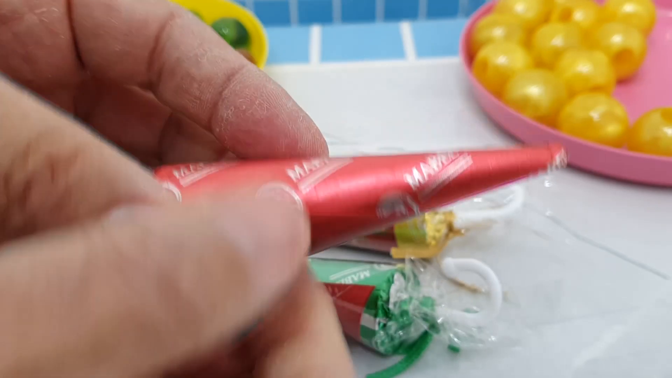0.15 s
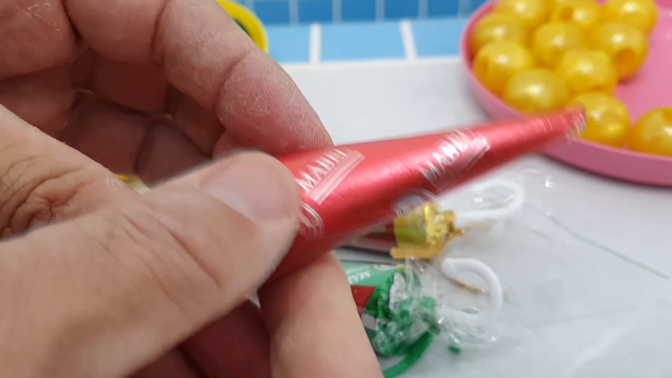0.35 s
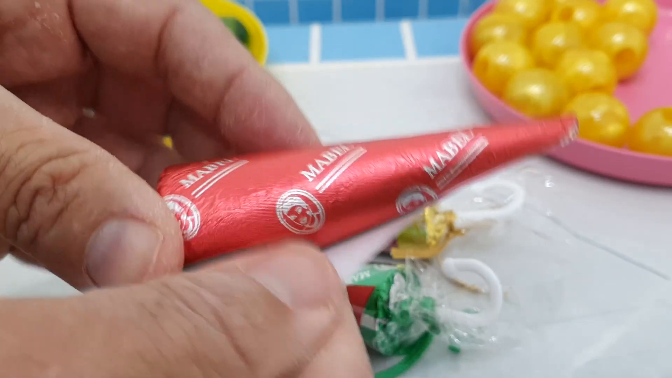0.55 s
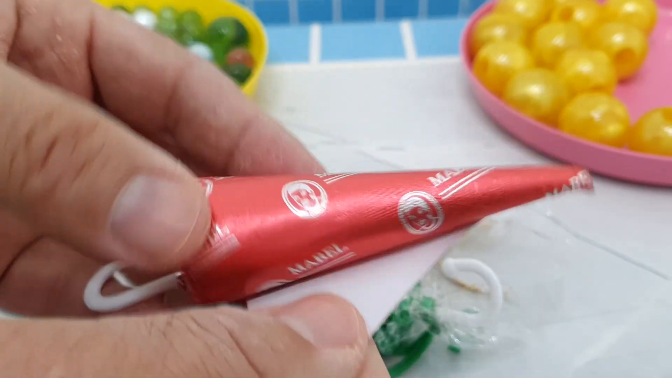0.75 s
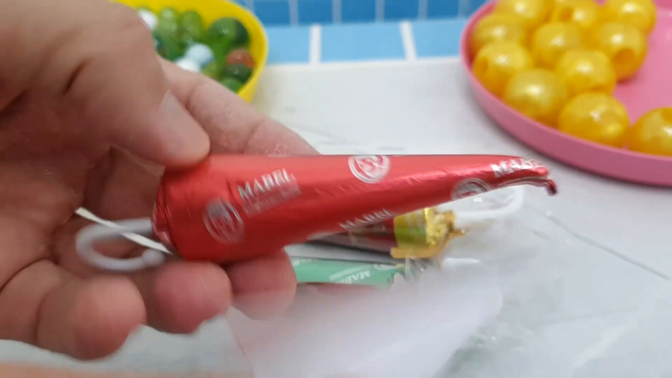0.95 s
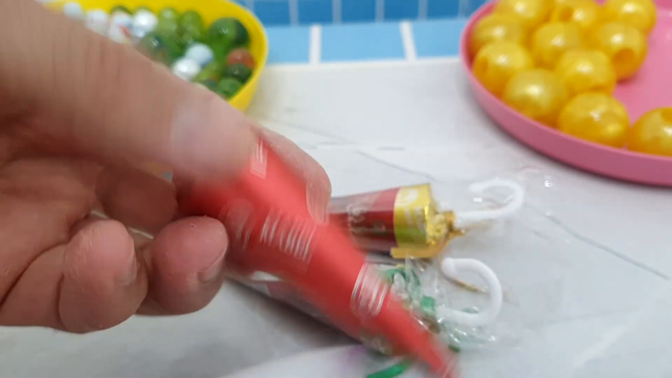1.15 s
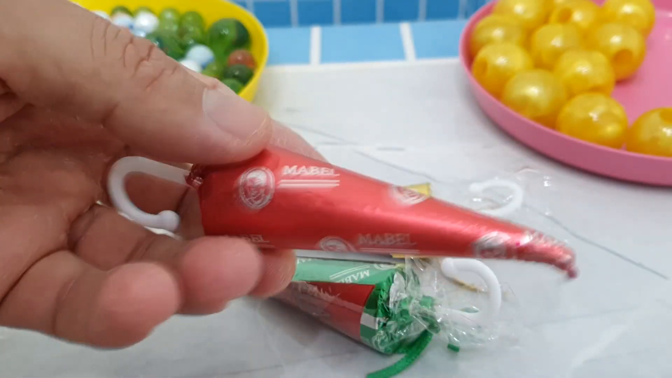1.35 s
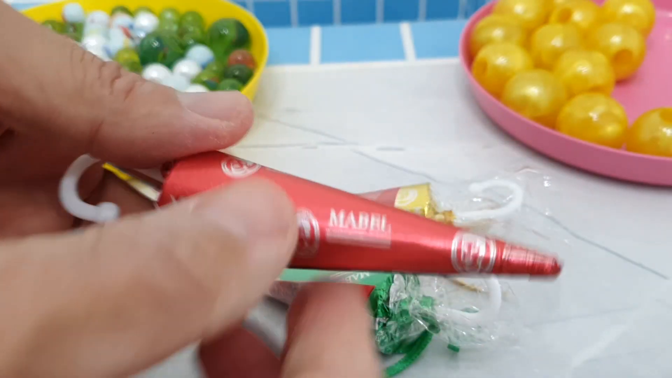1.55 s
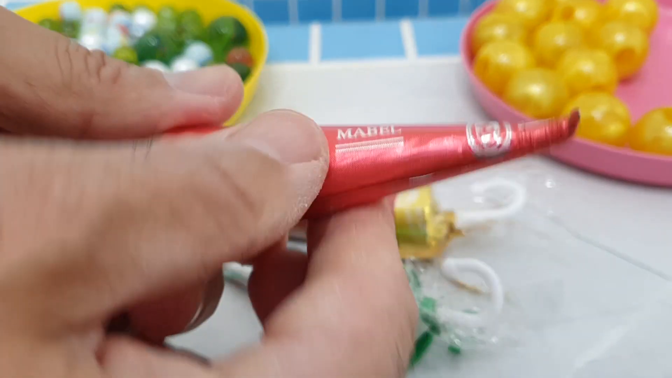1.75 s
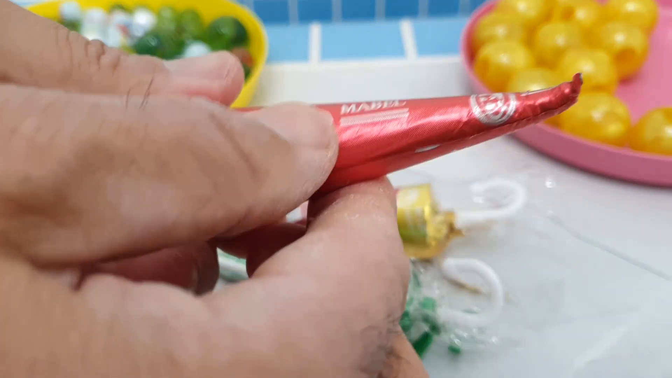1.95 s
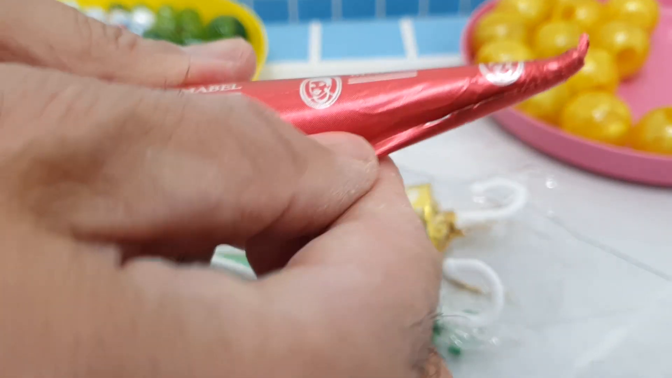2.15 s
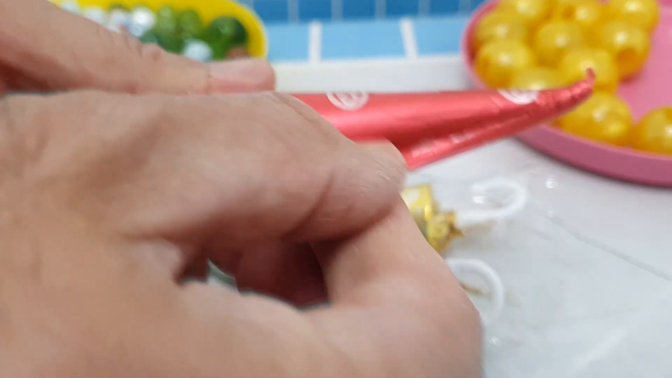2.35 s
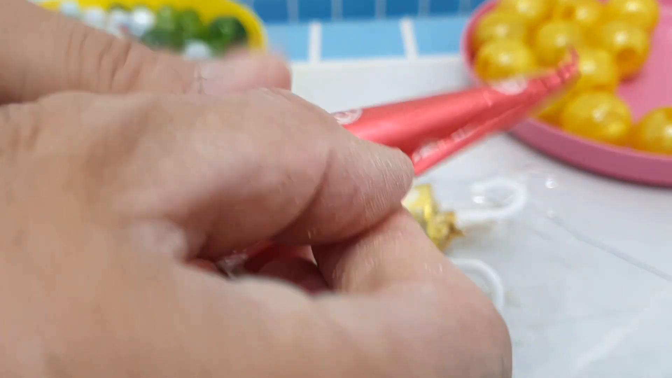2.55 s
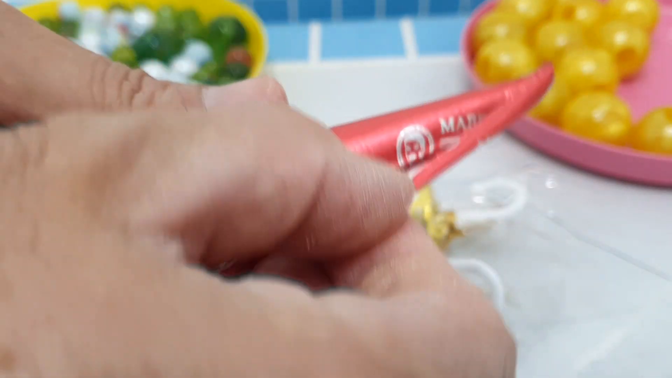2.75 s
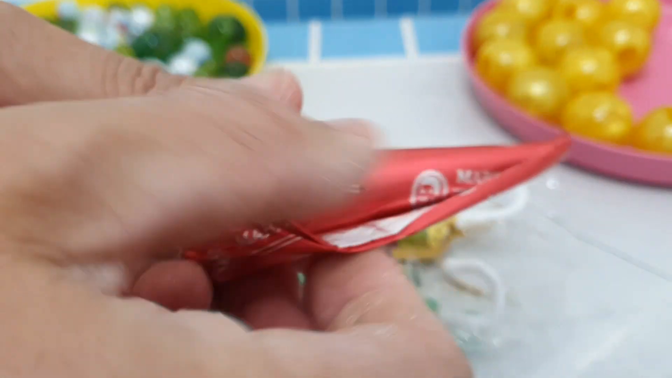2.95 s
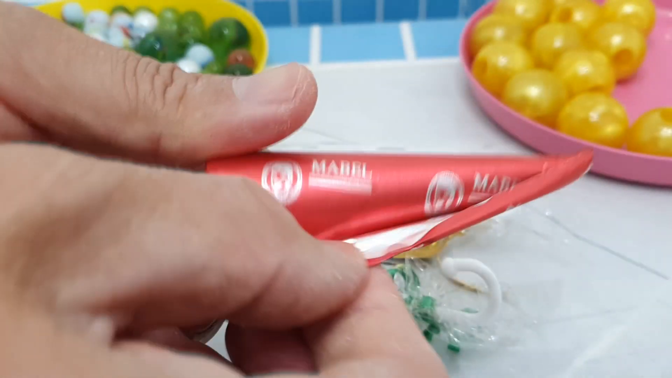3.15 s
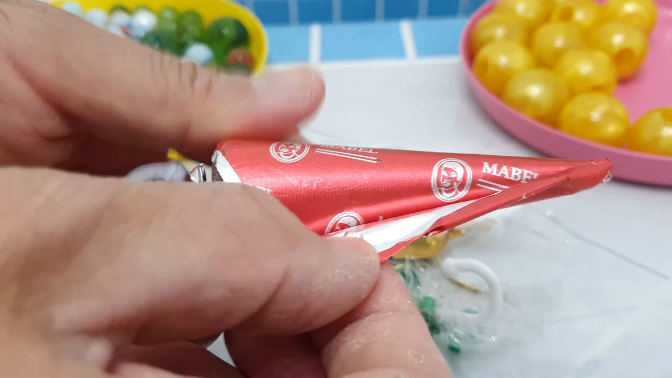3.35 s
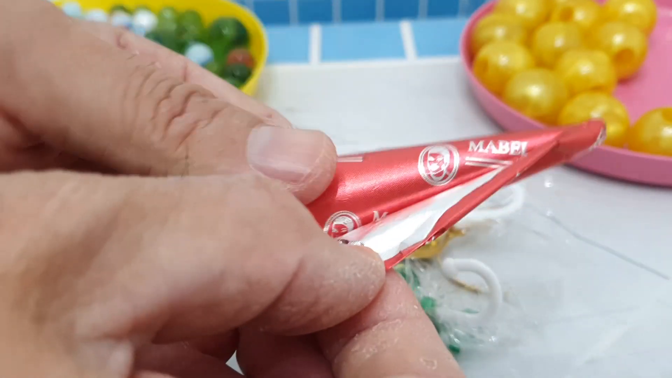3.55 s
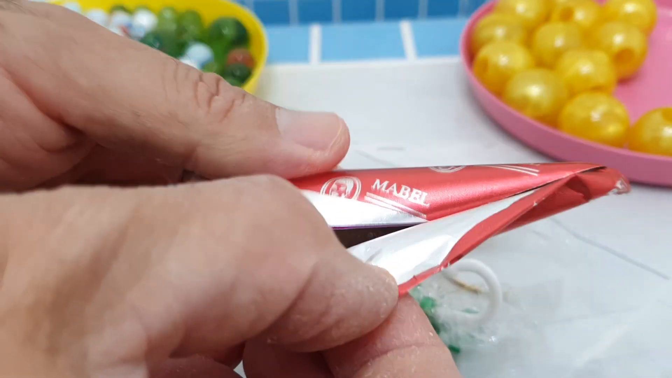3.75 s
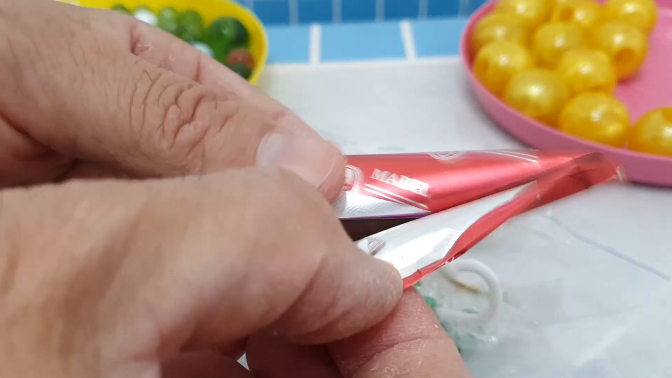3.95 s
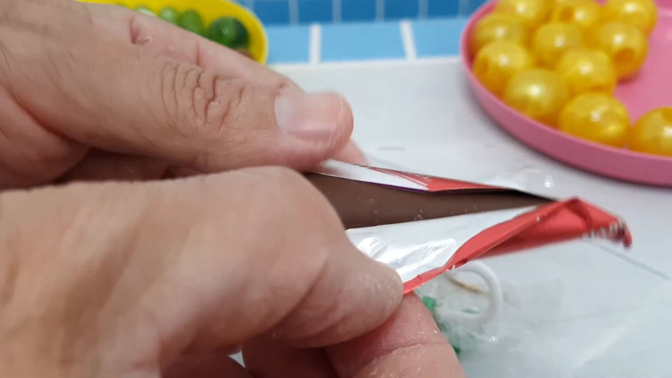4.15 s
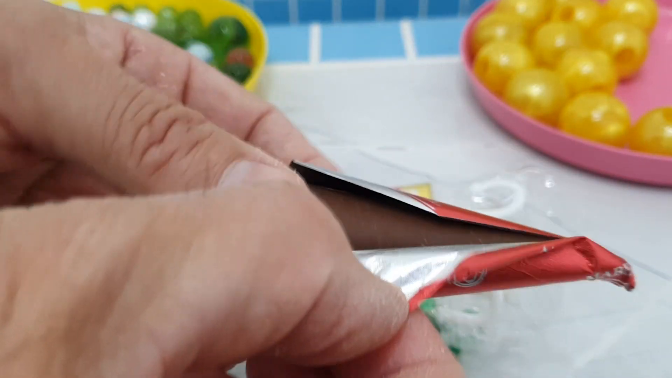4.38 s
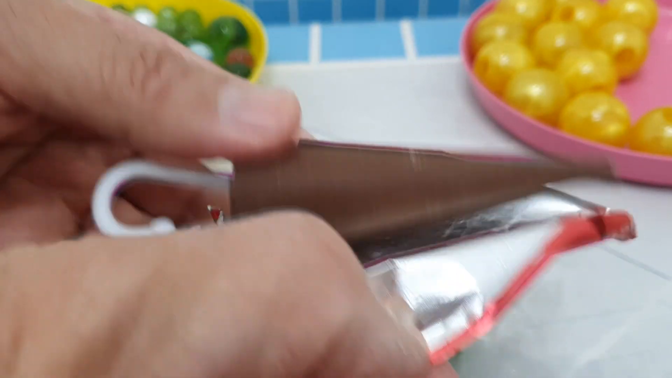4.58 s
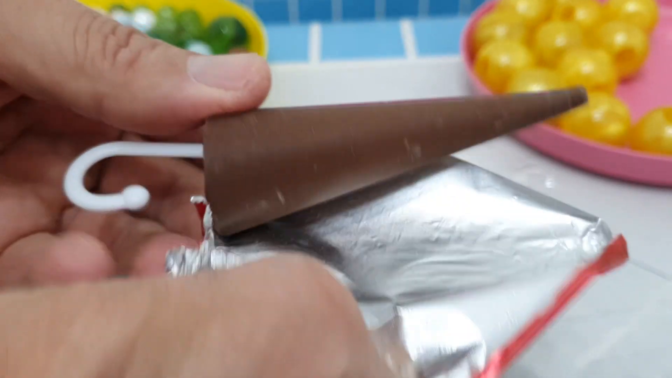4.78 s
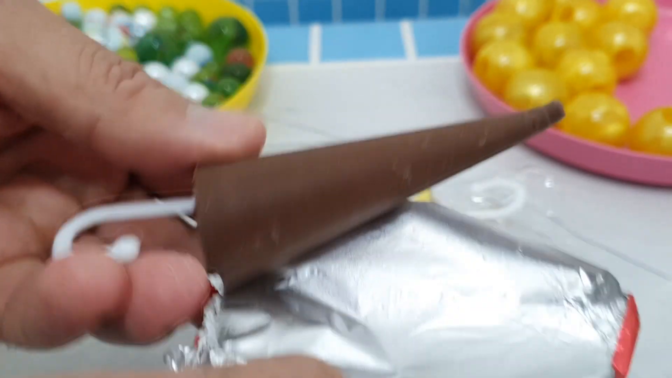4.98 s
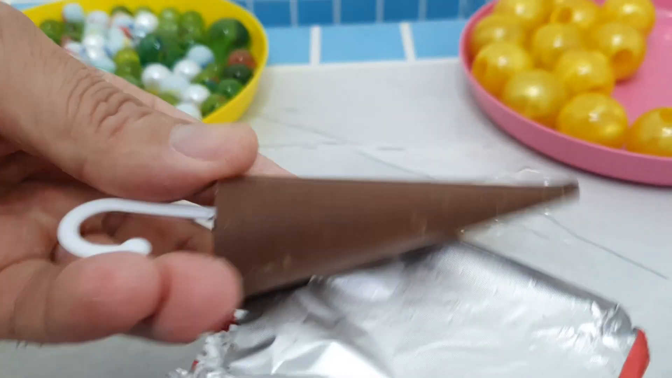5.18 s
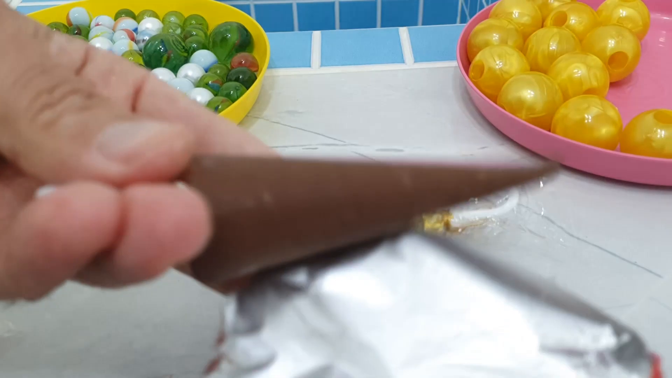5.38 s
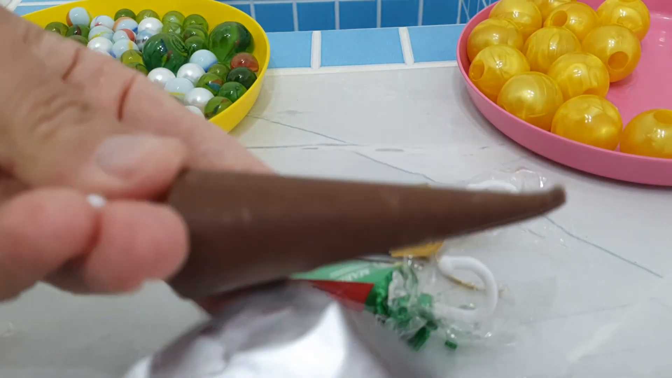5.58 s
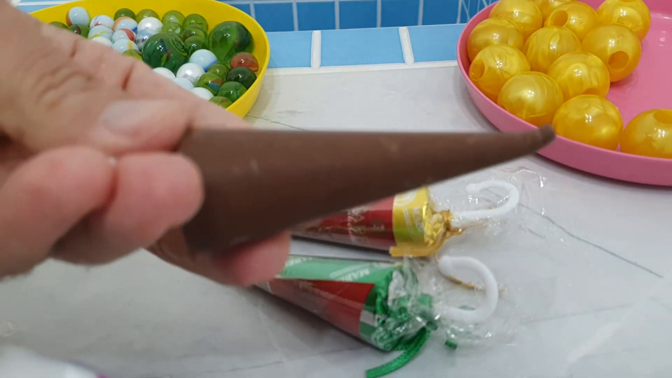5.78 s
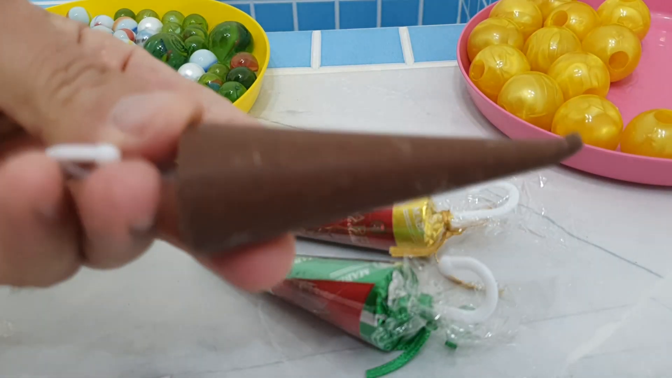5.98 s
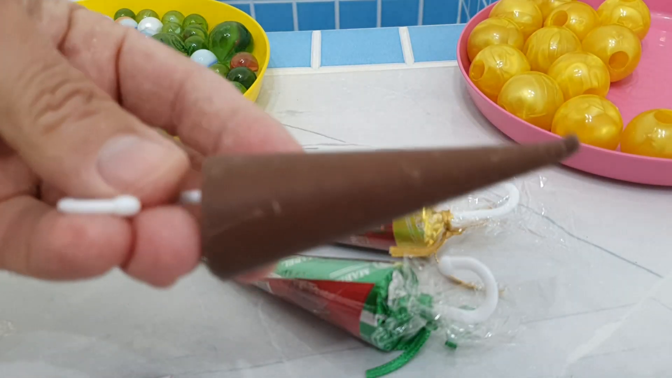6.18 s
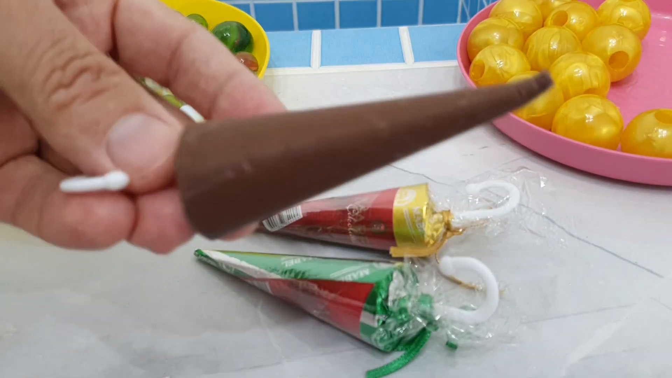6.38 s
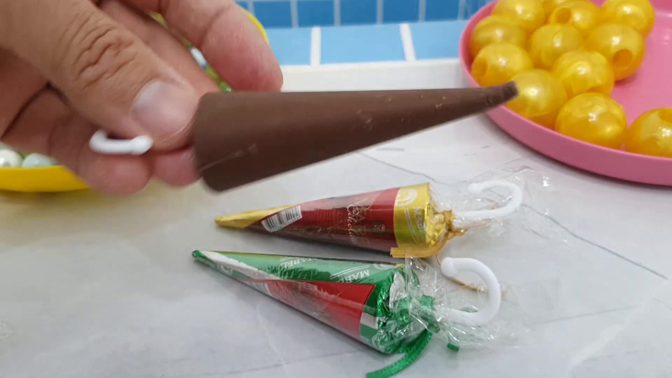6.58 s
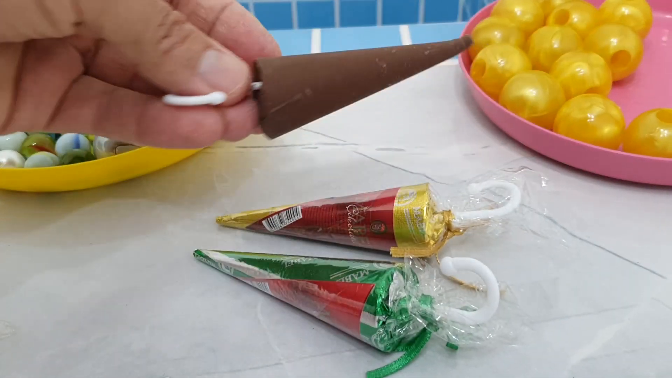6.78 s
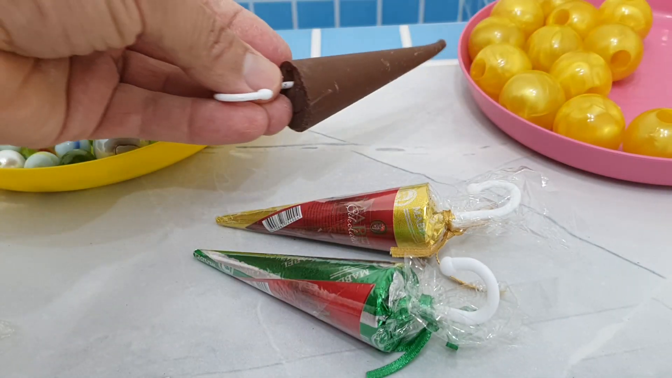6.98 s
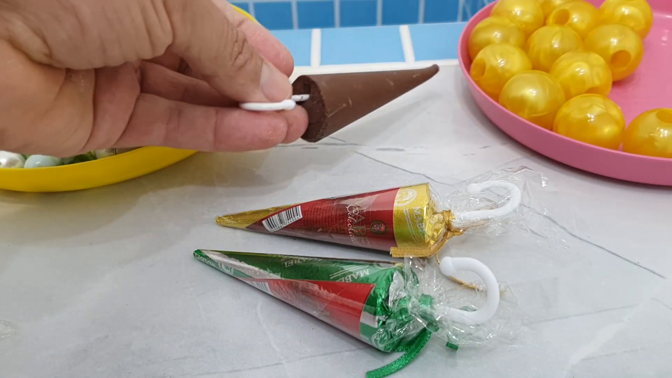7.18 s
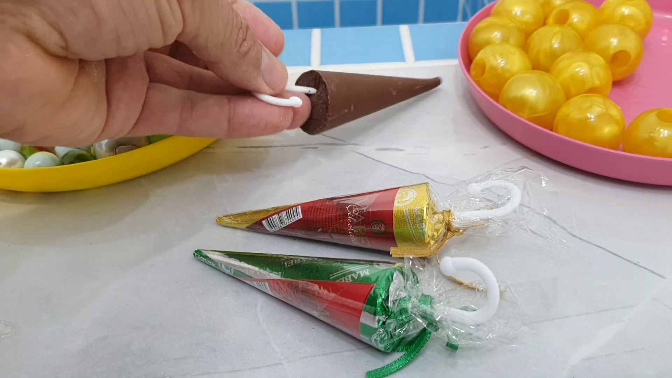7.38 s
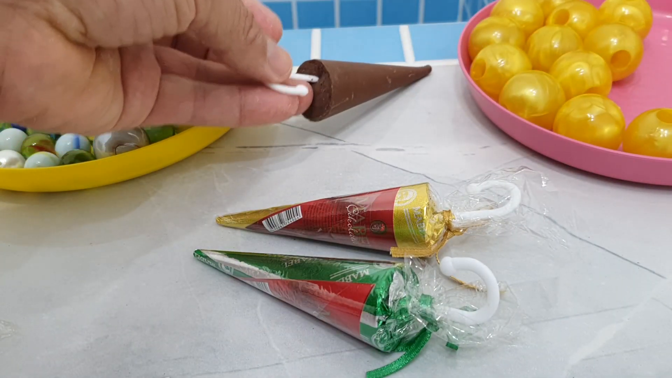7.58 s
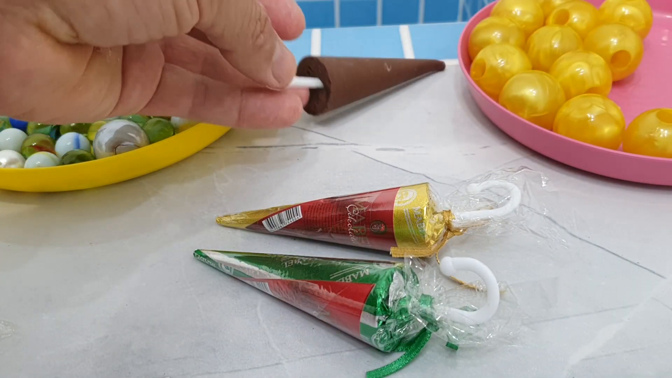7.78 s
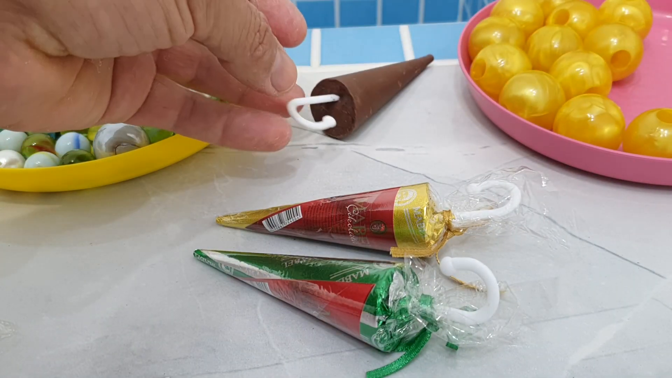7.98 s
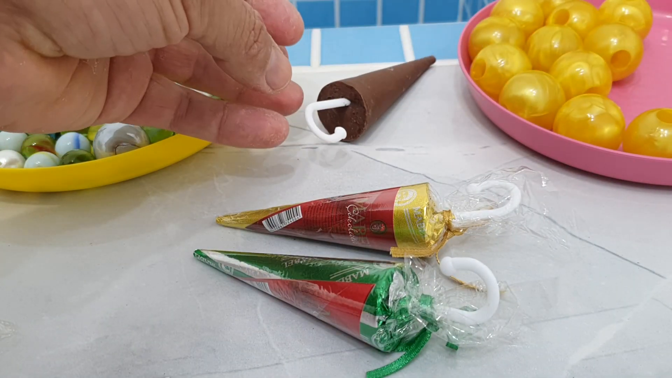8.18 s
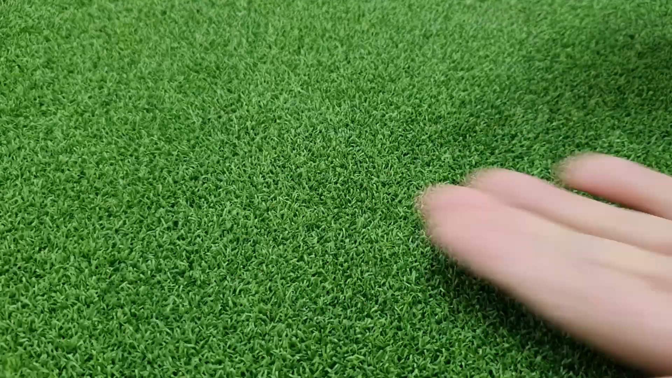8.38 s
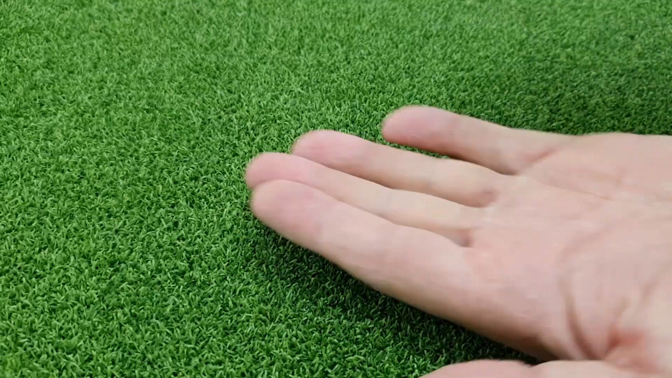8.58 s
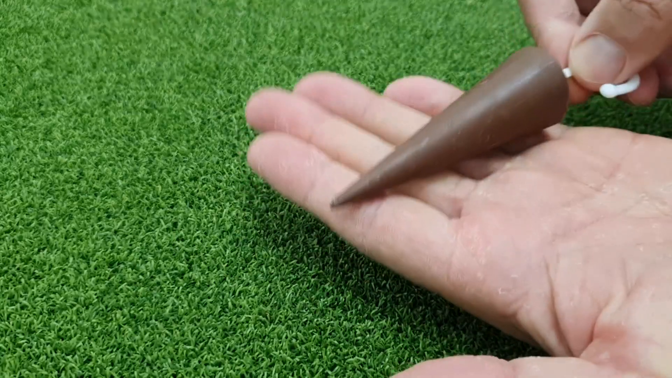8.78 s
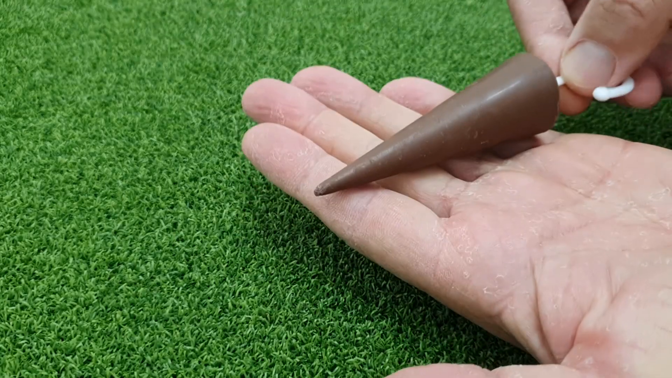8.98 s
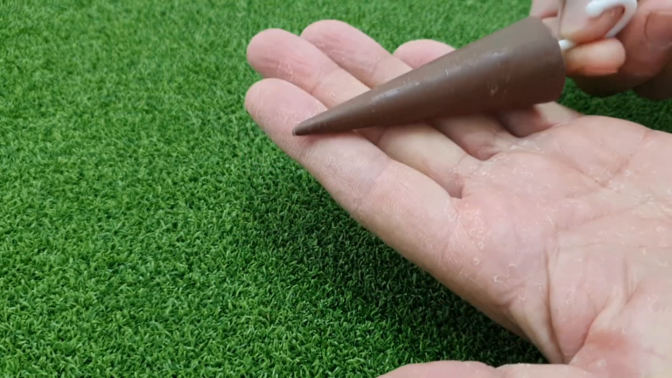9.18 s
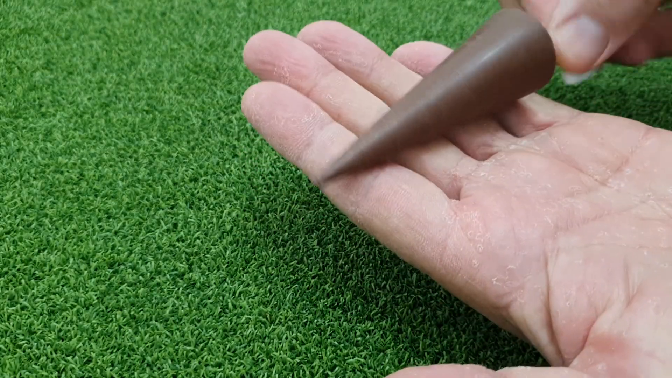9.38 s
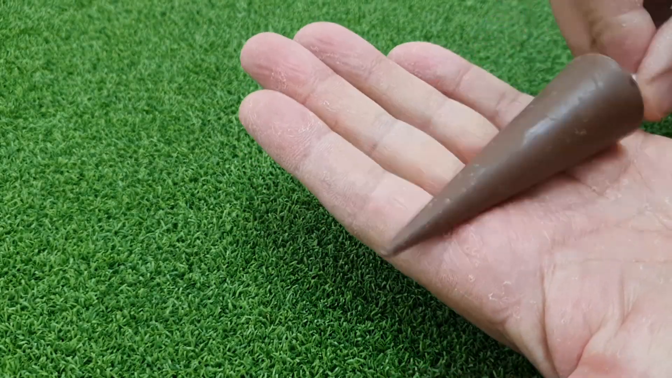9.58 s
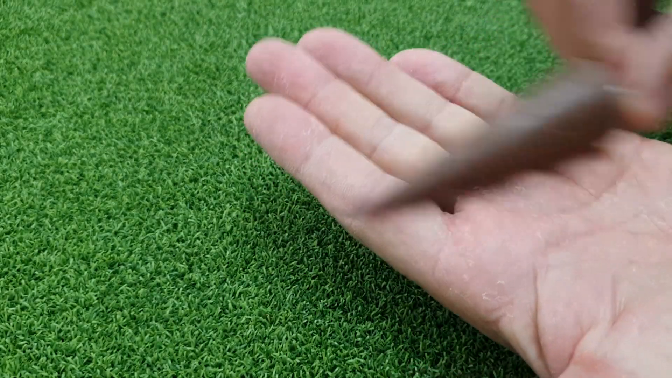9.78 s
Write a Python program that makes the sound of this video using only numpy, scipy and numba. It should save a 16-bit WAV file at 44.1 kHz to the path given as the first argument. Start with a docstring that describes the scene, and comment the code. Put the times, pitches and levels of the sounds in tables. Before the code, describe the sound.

Hands unwrap a foil-covered chocolate close to a phone microphone in a small hard room, over a faint machine hum. For the first three seconds the foil crackles in short, separate tugs, with a sharp snap and soft knock at about 0.9 seconds. From 3 seconds the crinkling becomes louder and denser, full of crisp snaps, and is strongest between about 4.4 and 5.6 seconds, where the open sheet adds a low flutter and a few dull bumps. The foil dies away by 6 seconds. Fingers then slide softly on the chocolate, with small hard ticks around 6.2, 6.5 and 7.4 seconds and a weaker one near 7.9. At about 8.3 seconds the hum cuts off and another room's slightly louder steady noise takes over. A tick with a light knock comes at 8.7 seconds, then very faint skin rubbing until nearly 10 seconds.

```python
"""Unwrapping a sweet

Hands peel paper and foil off a sweet in a small hard room, close to a phone with two microphones.
Each tug makes creases snap and crackle, built here from thousands of tiny fading tones ("grains").
The open sheet booms a little and a machine hums. Then skin slides softly and a few hard ticks sound.
Near the end the background cuts to the noise of another room, without the hum."""
import sys
import numpy as np
from scipy import signal
from scipy.fft import rfft, irfft
from scipy.io import wavfile
from scipy.ndimage import uniform_filter1d
from numba import njit

SR = 44100
rng = np.random.default_rng(int(sys.argv[2]) if len(sys.argv) > 2 else 0)


def bounce(signal):
    """Save signal as a 16-bit WAV file at the path given by the first command-line argument."""
    frames = np.transpose(np.atleast_2d(signal))
    limited = np.clip(frames, -1, 1)
    pcm = np.round(limited * 32767).astype(np.int16)
    wavfile.write(sys.argv[1], SR, pcm)


N = 433939
T = np.arange(N) / SR

# Tone colour of the background noise in each room: f/Hz, relative level/dB
FIRST_ROOM_NOISE = [(15, -45.5), (25, -2.5), (70, -8.5), (155, -11), (213, -8.5), (335, -15), (966, -28),
                    (1190, -28), (2140, -43), (3260, -43), (9410, -50.5), (13000, -68.5)]
SECOND_ROOM_NOISE = [(15, -37), (25, -42), (48, 4.5), (107, -10.5), (182, -0.5), (219, -2.5), (257, -3),
                     (1920, -28.5), (3180, -30.5), (4600, -40), (13000, -50.5)]
# The machine's main tone: t/s, f/Hz, level/dB
HUM_TONE = [(0.07, 206.2, -55.5), (.83, 208.2, -59.5), (1.85, 211, -63.5), (2.52, 207.3, -62),
            (2.66, 207.2, -58), (3.202, 207.5, -53), (3.8, 206.3, -54.5), (5.501, 205.2, -52),
            (6.3, 204.8, -56), (8.3, 204.7, -55)]
# Its drone, about an octave lower: t/s, level/dB
HUM_DRONE = [(0, -69), (2.8, -78.5), (3.1, -65), (3.7, -67.5), (4.0, -75), (7.1, -76), (7.25, -63),
             (7.55, -65.5), (7.7, -92)]
# Hand or sheet pushing air and knocking the table: t/s, level/dB, f/Hz, time to fade by 60 dB/s
THUMPS = [(0.928, -33.5, 111, 0.06), (.932, -41.5, 630, 0.08), (.9325, -21.5, 1656, 0.023),
          (.934, -54, 1730, 0.47), (5.08, -34, 75, 0.067), (5.396, -31, 118, 0.028),
          (5.463, -35, 169, 0.093), (5.475, -34.5, 373, 0.048), (5.5, -38.5, 91.3, 0.21),
          (5.552, -35.5, 700, 0.12), (5.603, -42, 65.6, 0.42), (5.605, -24, 364, 0.01),
          (8.652, -38, 459, 0.014), (8.698, -44, 95, 0.089)]
# The loudest creases giving way. "Body" is the low part of a sound, "sizzle" the high part.
# t/s, ring level/dB, ring f/Hz, body level/dB, sizzle level/dB
LOUD_SNAPS = [(0.157, -51, 6100, -61, -48), (0.4963, -44.5, 3850, -69, -68), (0.558, -45, 4420, -55, -39),
              (0.926, -45, 3400, -34.5, -26), (0.9325, -28, 3700, -33, -14),
               (1.2092, -52, 5230, -42.5, -27), (1.2638, -28, 5130, -77, -23), (1.287, -35, 4540, -64, -26),
              (1.362, -51, 4450, -44, -49), (1.4108, -38.5, 5240, -45.5, -29),
              (1.5527, -45, 5860, -78, -50), (2.0035, -51, 2060, -46, -35.5),
              (2.1291, -41, 6570, -33.5, -41), (2.223, -36, 4300, -30, -33), (2.2408, -32, 6800, -34, -26),
              (2.2587, -26.5, 5230, -60, -25), (2.272, -26, 4800, -49, -21.5),
              (2.296, -33, 5160, -36.5, -26), (2.5393, -32.5, 6370, -72, -59),
              (2.5653, -29, 5910, -64, -53), (2.575, -34, 3124, -74, -40), (2.6075, -38, 6100, -69, -19.5),
              (2.6335, -30, 4900, -58, -23.5), (2.6788, -26, 3570, -33.5, -34),
              (2.6829, -25.5, 6400, -38, -29), (2.7388, -50, 6400, -45, -17),
              (2.8472, -39.5, 5500, -34.5, -31.5), (3.0219, -34, 5900, -44, -20.5),
              (3.0613, -31.5, 4650, -65, -35.5), (3.082, -34, 4540, -52.5, -28),
              (3.0923, -28, 3650, -61, -22.5), (3.15, -20, 5100, -64, -19.5),
              (3.3034, -27.5, 6340, -39.5, -22.5), (3.4947, -34, 3620, -69.5, -36),
              (3.5219, -33.5, 6360, -71, -52), (3.5594, -26.5, 3000, -49, -49),
              (3.5943, -16.5, 3820, -69, -14), (3.6123, -32.5, 3517, -50.5, -43),
              (3.6274, -20, 3330, -27.5, -19.5), (3.6417, -22.5, 3270, -33, -21),
              (3.6883, -32, 3050, -24, -46), (3.7455, -28, 6520, -25, -15.5),
              (3.9199, -32.5, 3700, -28, -24), (4.0012, -33, 4014, -41, -29.5),
              (4.0362, -24.5, 3420, -23.5, -22), (4.0963, -30.5, 5500, -32.5, -25),
              (4.2438, -38, 4540, -50, -20), (4.35, -32.5, 6060, -41.5, -28.5),
              (4.3777, -32, 4390, -35.5, -35), (4.4182, -17, 7100, -31.5, -15),
              (4.4327, -20, 3020, -29.5, -39), (4.441, -34, 4000, -27, -30), (4.456, -27, 3240, -36, -21.5),
              (4.477, -45, 2220, -18, -26.5), (4.4872, -13, 3200, -17.5, -10.5),
              (4.5352, -25, 4720, -22.5, -20.5), (4.6172, -22, 3300, -17.5, -7),
              (4.6241, -25.5, 6230, -16, -19.5), (4.6811, -31, 4930, -23, -28),
              (4.7547, -22.5, 5540, -16.5, -20.5), (4.816, -28.5, 3860, -16, -28),
              (4.8491, -31, 6610, -16, -27), (4.922, -37.5, 3800, -20.5, -28.5),
              (4.95, -34, 5000, -28, -24.5), (4.9868, -31, 5470, -30.5, -18.5),
              (5.003, -30.5, 4500, -27.5, -30), (5.0204, -30, 5020, -20, -14),
              (5.0809, -31.5, 3470, -23, -15), (5.2031, -32.5, 4100, -22.5, -36),
              (5.26, -39.5, 2220, -27.5, -33), (5.32, -36.5, 4000, -38, -40),
              (5.391, -36, 4030, -30.5, -37), (5.4624, -27, 2140, -18, -17),
              (5.4752, -32, 3670, -27.5, -16), (5.5515, -29, 3550, -40, -22.5),
              (5.5953, -27, 7000, -41, -26)]
# Small hard ticks: the columns of LOUD_SNAPS, then pitch spread/ratio, echo share/dB
HARD_TICKS = [(6.151, -31, 4600, -78, -23, 2.3, -8.5), (6.486, -26, 4160, -66, -22.5, 1.62, -5.5),
              (7.405, -32.5, 4770, -63, -34, 1.16, -2.5), (7.4123, -35.5, 4765, -57, -40, 1.07, -3),
              (7.4196, -59, 4710, -50, -36.5, 0.98, 8), (7.7, -65.5, 4330, -78, -70, 1.2, 3),
              (7.921, -45.5, 3420, -41.5, -80, 1.7, 5), (7.9497, -60, 2610, -49, -85, 1.8, 11),
              (8.6535, -29, 3980, -31.5, -27, 1.87, -9.5), (8.696, -49, 4500, -41, -47, 1.2, 1.5)]
# Fingers tugging at the wrapper; rise and fall are the times for a change of SWING_DB.
# peak t/s, level/dB, rise/s, fall/s, relative body level/dB, relative sizzle level/dB
WRAPPER_TUGS = [(0.05, -69.5, 0.54, 0.21, -36, -1), (0.48, -56.5, .14, 0.11, -34, -1.5),
                (0.79, -70, 0.09, 0.31, -5, 1), (0.93, -49.5, 0.045, 0.11, 1.5, -3),
                (1.199, -58.5, 0.15, 0.13, -6, -4), (1.277, -57, .03, 0.23, -26, 0.5),
                (1.564, -64, 0.024, 0.18, -28, -4), (2.01, -74, 0.017, 1, 5.5, -4),
                (2.275, -52, .08, 0.18, -5.5, -3.5), (2.574, -42, 0.0097, 0.18, -36, -3.5),
                (2.68, -67, 0.099, 0.27, 8.5, -7), (3.061, -38.5, 0.02814, 0.06, -10, -5.5),
                (3.19, -36.5, 0.086, 0.14, -29, -15.5), (3.25, -46, 0.25, 0.059, -27.5, -12.5),
                (3.514, -44.5, .025, 0.14, -30, -12), (3.63, -33, .06, 0.13, -9.5, -9),
                (3.917, -45.5, 0.0095, 0.2, -21.5, -11), (4.009, -41.5, 0.094, 0.13, -2, -8.5),
                (4.239, -43, 0.14, 0.014, 1.5, -8.5), (4.351, -36.5, 0.03, 0.07, -7.5, -7),
                (4.42, -34, 0.0143, 0.38, -2.5, -5.5), (4.548, -35, 0.063, 0.041, -1, 0),
                (4.655, -46.5, 0.44, 0.41, 1, -12), (4.765, -37.5, 0.0127, 0.13, 2.5, -7.5),
                (4.84, -32, 0.09, 0.042, -10, -4), (4.922, -37.5, 0.044, 0.056, 4.5, -4),
                (5.025, -33.5, 0.055, 0.033, 4, -2), (5.084, -34, .025, 0.058, 3.5, -5.5),
                (5.207, -37, .08, 0.062, 1.5, -6.5), (5.262, -41, .05, 0.078, 4, -4),
                (5.464, -26.5, 0.0085, 0.02, -20, -2.5), (5.54, -41.5, 0.24, 0.099, 0, -3),
                (5.609, -31.5, 0.065, 0.031, -2.5, -2.5), (5.847, -52.5, .19, 0.059, -6.5, -9)]
# Skin sliding on the sweet and the table: same columns as WRAPPER_TUGS
SKIN_SLIDES = [(6.06, -66, 0.077, 0.27, -5, -6.5), (6.36, -60, 0.028, 0.14, -45, -2),
               (6.68, -70, 0.037, 0.14, -28, 9), (6.849, -60.5, 0.29, 0.16, -22, -3),
               (7.1, -81.5, 0.49, 0.8, -25, -4.5), (7.9, -79.5, 1.8, 1.1, -6, -10),
               (8.371, -56.5, 0.016, 0.23, 0.5, -6.5), (8.701, -65.5, 0.11, 0.25, -2, -11),
               (9.6, -89.5, 0.16, 1.4, -4, 14.5), (9.801, -77, 0.044, 0.073, -22, 18)]
# Pitches that the microphone openings boost: f/Hz, width/Hz, boost/dB
MIC_RESONANCES = [(3513, 1860, 3), (9760, 1800, 5.5)]

# Bands in which grains ring:
# lowest f/Hz, highest f/Hz, length/cycles, left minus right/dB, its scatter/dB, left lead/ms
FOIL_BODY = (913, 2180, 3.18, 3.5, 2.1, 0.12)
FOIL_CRACKLE = (1856, 11500, 3.5, 3.1, 18, 0.15)
FOIL_SIZZLE = (6199, 15003, 3.5, -1.5, 11, 2.36)
TICK_BODY = (640, 2800, 3.1, 1.1, 2.0, 0.079)  # hard things knock more broadly than the sheet
SKIN_RUB = (2440, 5250, 4, *FOIL_CRACKLE[3:])
SKIN_HISS = (4040, 17300, 2.5, *FOIL_SIZZLE[3:])

PAPER_GONE_S, ROOM_CUT_S, SLIDES_END_S = 5.95, 8.35, 9.84
FIRST_ROOM_DB, SECOND_ROOM_DB, DRONE_HZ = -62, -57.5, 106.6
ECHO_FADE_S, ECHO_TOP_HZ, ECHO_SHARE_DB = 0.39, 7500, -14.5
GRAINS_PER_S, SMALL_SNAPS_PER_S = 4000, 40
SNAP_STEP_S = 0.0003  # sets the spacing of the steps in which a crease lets go
SWING_DB = 20
FLAP_BAND_HZ, FLAP_DB = (45, 430), -13.5
SHEET_LOW_HZ, QUIET_TOP_HZ, MIC_LOW_HZ, MIC_TOP_HZ = 520, 11900, 41, 16000


def from_db(db):
    """Turn decibels into a factor to multiply by."""
    return 10 ** (np.asarray(db) / 20)


def normalise(x):
    """Scale a sound to an average power of 1."""
    return x / np.sqrt(np.mean(x ** 2))


def filtered(x, kind, hz, order=2):
    """Keep the "low" side, the "high" side or a "band" of a sound; a higher order cuts more sharply."""
    return signal.sosfilt(signal.butter(order, hz, kind, fs=SR, output="sos"), x)


def wander(per_s):
    """A smooth random curve that strays about 1 either side of zero."""
    hold = int(SR / per_s)
    steps = np.repeat(rng.standard_normal(N // hold + 1), hold)
    return np.sqrt(2) * uniform_filter1d(uniform_filter1d(steps, hold), hold)[:N]


@njit
def fading_tones(start, turn, fade, gain, size):
    """Add up fading sine waves, each with its own start and strength at each microphone."""
    out = np.zeros((2, size))
    for k in range(len(turn)):
        step = fade[k] * np.exp(1j * turn[k])  # turns and shrinks the wave by one sample's worth
        for mic in range(2):
            first = int(start[mic, k])
            wave = gain[mic, k] * step ** (first + 1 - start[mic, k])
            for j in range(first + 1, min(size, first + int(-6 / np.log(fade[k])))):
                out[mic, j] += wave.imag
                wave *= step
    return out


def grains(times, hz, gain, place, cycles, pan_db, scatter_db, lead_ms):
    """Short rings whose place on the sheet shifts the delay and balance between left and right."""
    start = np.array([times, times + lead_ms / 1000 * (1 + 0.6 * place)]) * SR
    balance = from_db(np.array([1, -1])[:, None] * (pan_db + scatter_db * place) / 2)
    fade = np.exp(-3 * hz / cycles / SR)
    return fading_tones(start, 2 * np.pi * hz / SR, fade, gain * balance, size=N)


def trim_lows(x, ring_hz):
    """Grains carry no sound far below their ring."""
    return filtered(x, "high", 0.54 * ring_hz)


def room_noise(colour, db):
    """Steady background: the microphones share most of the bass, but not the treble."""
    hz = np.maximum(np.fft.rfftfreq(N, 1 / SR), 1)
    colour_hz, colour_db = np.transpose(colour)
    shape = from_db(np.interp(np.log(hz), np.log(colour_hz), colour_db))
    alike = 0.89 / (1 + (hz / 500) ** 3)
    shared, apart = rfft(rng.standard_normal((2, N))) * shape * np.sqrt([1 + alike, 1 - alike])
    return normalise(irfft(np.array([shared + apart, shared - apart]), N)) * from_db(db)


def machine_hum():
    """A motor tone that swells slowly and trembles, over a weak wavering drone."""
    times, hz, db = np.transpose(HUM_TONE)
    tone = np.sin(2 * np.pi * np.cumsum(np.interp(T, times, hz)) / SR)
    tone *= from_db(np.interp(T, times, db) + 0.88 * wander(8.6))
    drone = np.sin(2 * np.pi * np.cumsum(DRONE_HZ + 2.5 * wander(1.2)) / SR)
    drone *= from_db(np.interp(T, *np.transpose(HUM_DRONE)) + 1.8 * wander(1.0))
    return np.sqrt(2) * (tone + drone)


def wall_echo(sent):
    """The walls return a smeared, duller tail that fades by 60 dB in ECHO_FADE_S."""
    t = T[:int(0.6 * SR)]
    envelope = 1000. ** (-t / ECHO_FADE_S) * np.clip(t / 0.0014, 0, 1)
    shared, apart = rng.standard_normal((2, len(t))) * envelope
    apart = filtered(apart, "high", hz=1490)  # below this both microphones hear the same tail
    tail = filtered([shared + apart, shared - apart], "low", ECHO_TOP_HZ)
    tail /= np.sqrt(np.sum(tail ** 2, axis=1, keepdims=True))
    return signal.fftconvolve(sent[:1], tail, axes=1)[:, :N]


def thumps():
    """Dull knocks of hand or sheet with a soft start, nearer the left microphone."""
    times, db, hz, fade_s = np.transpose(THUMPS)
    cycles = 3 * hz * fade_s / np.log(1000)
    knocks = grains(times, hz, from_db(db), np.zeros_like(times), cycles,
                    pan_db=1.4, scatter_db=0, lead_ms=np.minimum(0.9, 120 / hz))
    return uniform_filter1d(knocks, size=16, axis=1)


def sheet_flap(times, db, body_db):
    """The moving sheet pushes air at the microphones: an uneven low rustle, different in each."""
    puffs = filtered(rng.standard_normal((2, N)), "band", FLAP_BAND_HZ)
    level_db = np.interp(T, times, db + body_db) + FLAP_DB + 1.5 * wander(27)
    return normalise(puffs) * from_db(level_db + np.array([[1], [-1]]))  # left is 2 dB louder


def hand_motion(strokes, start_s, end_s):
    """Overlapping strokes swell and fade. Gives times, level, and relative body and sizzle levels."""
    times = np.arange(start_s, end_s, 1 / 500)
    peak_s, db, rise_s, fall_s, body_db, sizzle_db = np.array(strokes).T[:, :, None]
    drop_db = SWING_DB * np.where(times < peak_s, (peak_s - times) / rise_s, (times - peak_s) / fall_s)
    bands_db = (db - drop_db, db + body_db - drop_db / 0.95, db + sizzle_db - drop_db)
    powers = [np.sum(from_db(2 * band_db), axis=0) for band_db in bands_db]
    level, body, sizzle = 10 * np.log10(np.array(powers) + 1e-30)
    return times, level, body - level, sizzle - level


def grain_swarm(times, db, body_db, sizzle_db, bands, spread_db, bunch_db):
    """Countless grains in three bands, mostly tiny and in bunches, as loud as the hand's motion."""
    bunches_db = bunch_db * (wander(180) + 0.55 * wander(45))
    span_s = times[-1] - times[0]
    out = 0
    for (low, high, *settings), relative_db in zip(bands, (body_db, 0, sizzle_db)):
        when, pitch, size, coin = rng.random((int(GRAINS_PER_S * span_s), 4)).T
        starts = times[0] + when * span_s
        grain_db = -spread_db * np.log(1 - size) + np.interp(starts, T, bunches_db)
        gain = from_db(grain_db) * np.sign(coin - 0.5)
        # neighbouring grains ring alike, and their pitch drifts as the sheet bends
        bend = np.clip(0.5 + 0.16 * np.interp(starts, T, wander(15)), 0, 1)
        hz = low * (high / low) ** ((pitch + bend) / 2)
        place = 2 * (2 * coin % 1) - 1
        swarm = trim_lows(grains(starts, hz, gain, place, *settings), low)
        swarm /= np.sqrt(np.sum(swarm ** 2) / (2 * SR * span_s))
        out = out + swarm * from_db(np.interp(T, times, db + relative_db))
    return out


def snaps(times, db, hz, body_db, sizzle_db, spread, body_band, steps):
    """A crease or tick lets go in a few quick steps, each weaker; a narrow ring lasts longer."""
    chance = rng.random((len(times), 3, 3, steps))
    ring_band = (hz / spread, hz * spread, 3.95 / np.log(spread), *FOIL_CRACKLE[3:])
    bands = ((body_band, body_db), (ring_band, db), (FOIL_SIZZLE, sizzle_db))
    out = 0
    for k, ((low, high, cycles, *stereo), level_db) in enumerate(bands):
        wait, pitch, coin = chance[:, k].transpose(1, 0, 2)
        pitch = (np.argsort(pitch, axis=1) + 0.5) / steps  # the steps share out the band evenly
        step_hz = low * (high / low) ** (0.15 + 0.7 * pitch)
        late = 12 / steps * (np.cumsum(wait, axis=1) - wait[:, :1])
        gain = 1.18 * from_db(level_db) * np.exp(-0.8 * late) * np.sign(coin - 0.5) * np.sqrt(6 / steps)
        place = 0.6 * (2 * (2 * coin % 1) - 1)
        columns = np.broadcast_arrays(times + SNAP_STEP_S * late, step_hz, gain, place, cycles)
        rings = grains(*(column.ravel() for column in columns), *stereo)
        out = out + trim_lows(rings, np.min(low))
    return out


def skin_rub():
    """Skin slides softly on the sweet and the table, making a fine, even stream of grains."""
    slides = hand_motion(SKIN_SLIDES, PAPER_GONE_S, SLIDES_END_S)
    rub = grain_swarm(*slides, (FOIL_BODY, SKIN_RUB, SKIN_HISS), spread_db=1.2, bunch_db=1.55)
    # the treble above about 12 kHz drops away in these quiet passages
    return filtered(rub, "low", QUIET_TOP_HZ, order=6)


def hard_ticks():
    """Small hard ticks, and the share of each sent to the walls, which depends on its distance."""
    times, *columns, echo_db = np.array(HARD_TICKS).T[:, :, None]
    direct = snaps(times, *columns, TICK_BODY, steps=24)
    latest_tick = np.clip(np.searchsorted(times[:, 0], T) - 1, 0, None)
    return direct, direct * from_db(echo_db[latest_tick, 0])


def small_creases(times, db, body_db, sizzle_db):
    """Rows like LOUD_SNAPS for lesser creases: random moments, with strength set by the tug under way."""
    when, size, pitch = rng.random((int(SMALL_SNAPS_PER_S * times[-1]), 3)).T
    starts = when * times[-1]
    ring_db = np.interp(starts, times, db) + 4.5 - 15 * size
    hz = 2550 * (7000 / 2550) ** pitch
    body = ring_db + np.interp(starts, times, body_db)
    sizzle = ring_db + np.interp(starts, times, sizzle_db)
    return np.transpose([starts, ring_db, hz, body, sizzle])


def wrapper_crinkle(tugs):
    """Tugged foil crackles as countless tiny creases give way, while larger ones snap one by one."""
    creases = np.vstack([LOUD_SNAPS, small_creases(*tugs)])
    crackle = grain_swarm(*tugs, (FOIL_BODY, FOIL_CRACKLE, FOIL_SIZZLE), spread_db=2.4, bunch_db=3.07)
    return crackle + snaps(*creases.T[:, :, None], spread=1.324, body_band=FOIL_BODY, steps=7)


def scene():
    """Mix the background, the sounds of the hands and their echo."""
    cut = np.clip((T - ROOM_CUT_S) / 0.0077, 0, 1)
    background = (1 - cut) * (machine_hum() + room_noise(FIRST_ROOM_NOISE, FIRST_ROOM_DB))
    background += cut * room_noise(SECOND_ROOM_NOISE, SECOND_ROOM_DB)
    tugs = hand_motion(WRAPPER_TUGS, 0, PAPER_GONE_S)
    hands = wrapper_crinkle(tugs) + skin_rub()
    ticks, ticks_to_walls = hard_ticks()
    echo = wall_echo(from_db(ECHO_SHARE_DB) * hands + ticks_to_walls)
    # such small, thin things cannot give off bass
    handling = filtered(hands + ticks + echo, "high", SHEET_LOW_HZ, order=3)
    return background + thumps() + sheet_flap(*tugs[:3]) + handling


def record(dry):
    """The microphone openings lift two treble bands; the phone cuts the deepest bass and the top."""
    for hz, width_hz, db in MIC_RESONANCES:
        resonance = signal.lfilter(*signal.iirpeak(hz, hz / width_hz, fs=SR), dry)
        dry = dry + (from_db(db) - 1) * resonance
    dry = filtered(dry, "high", MIC_LOW_HZ, order=4)
    return signal.sosfilt(signal.ellip(10, 0.2, 90, MIC_TOP_HZ, fs=SR, output="sos"), dry)


dry = scene()
out = record(dry)
bounce(out)
```